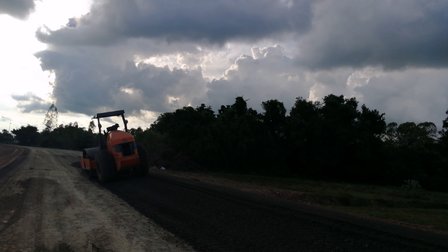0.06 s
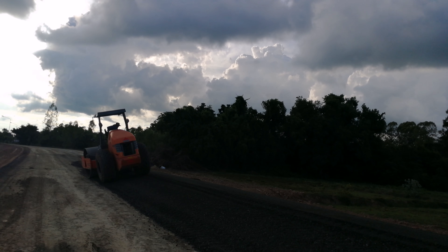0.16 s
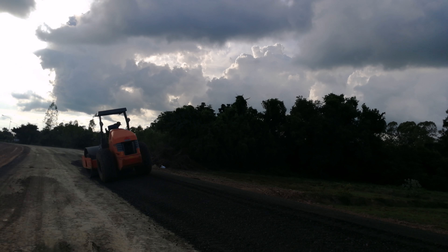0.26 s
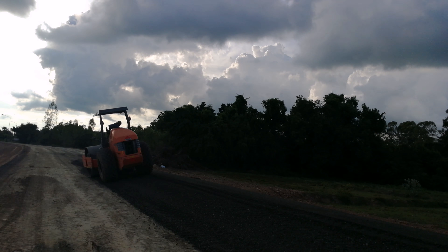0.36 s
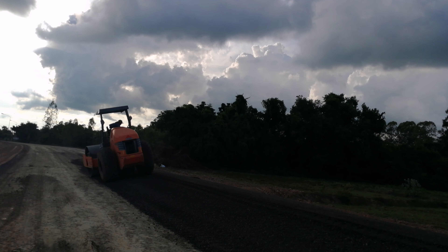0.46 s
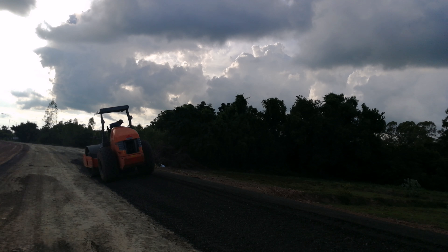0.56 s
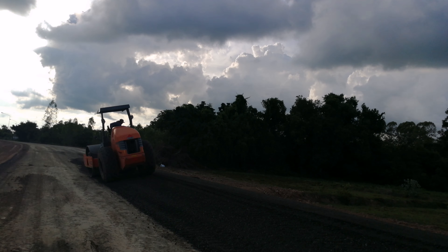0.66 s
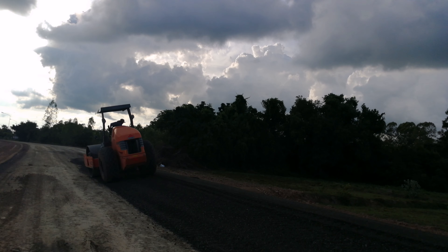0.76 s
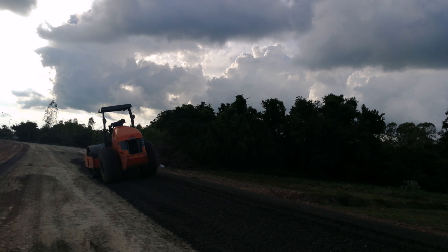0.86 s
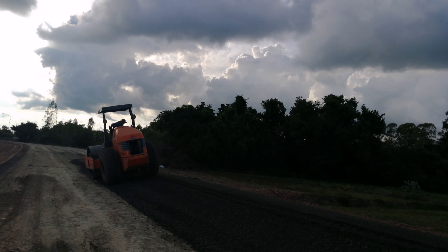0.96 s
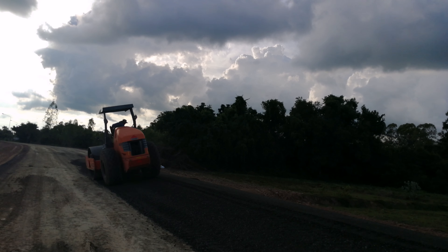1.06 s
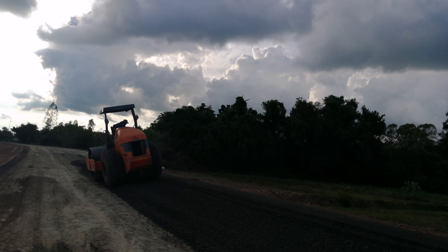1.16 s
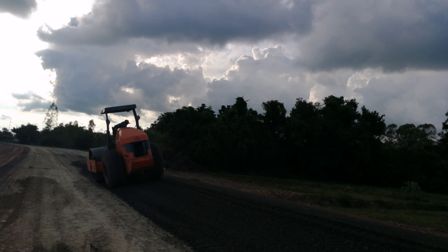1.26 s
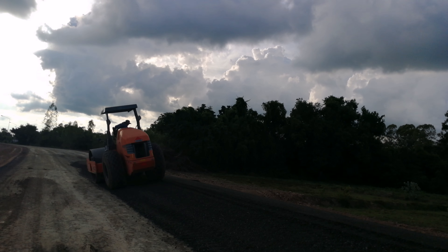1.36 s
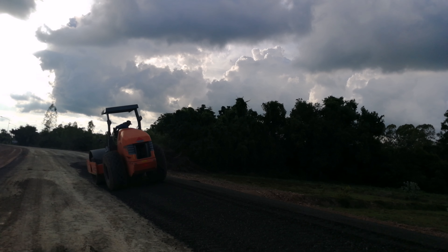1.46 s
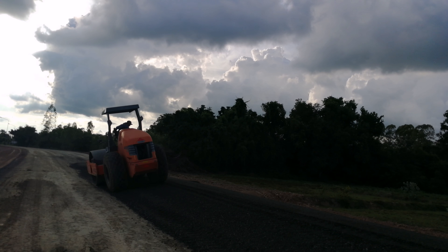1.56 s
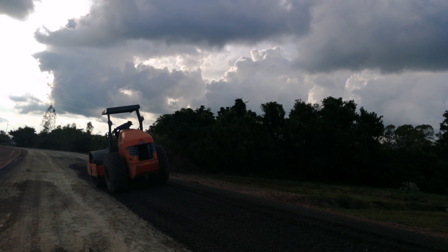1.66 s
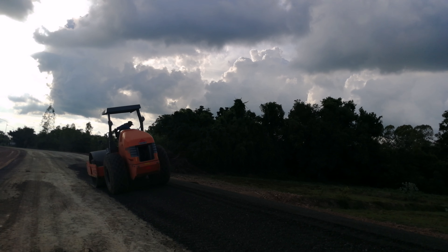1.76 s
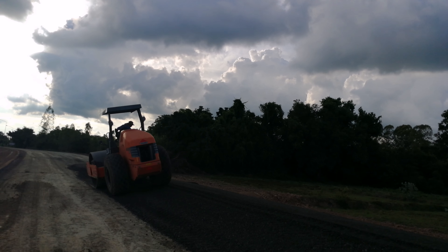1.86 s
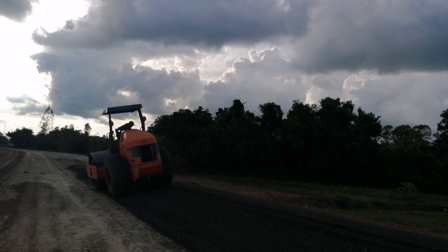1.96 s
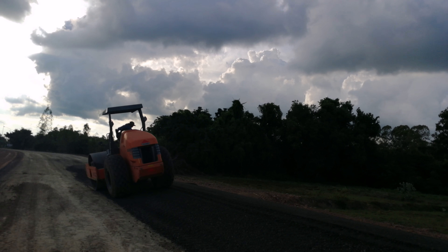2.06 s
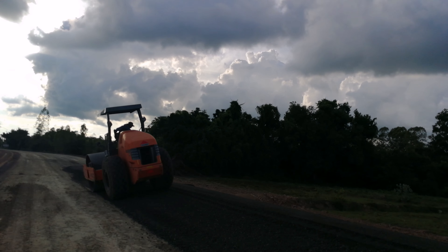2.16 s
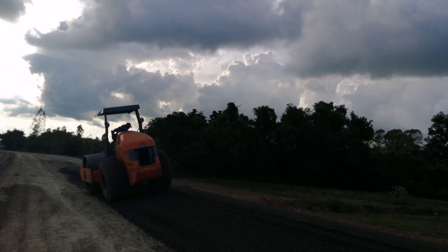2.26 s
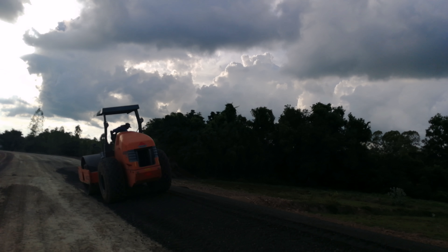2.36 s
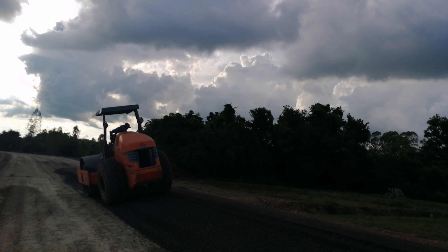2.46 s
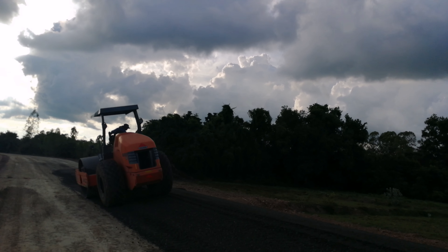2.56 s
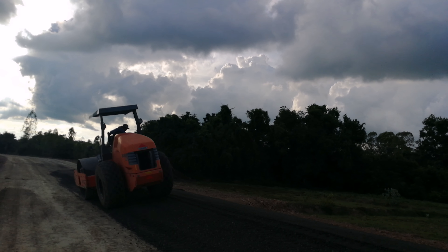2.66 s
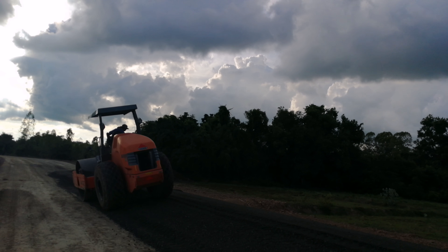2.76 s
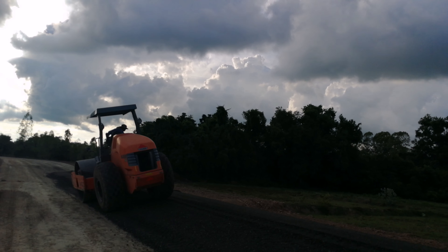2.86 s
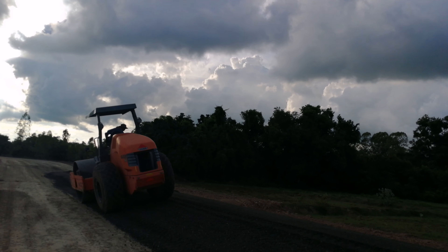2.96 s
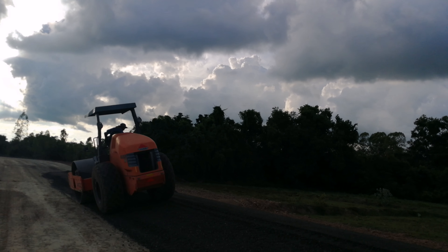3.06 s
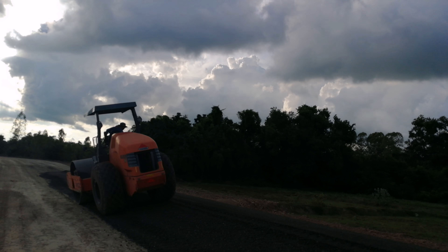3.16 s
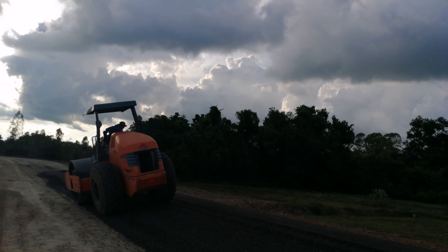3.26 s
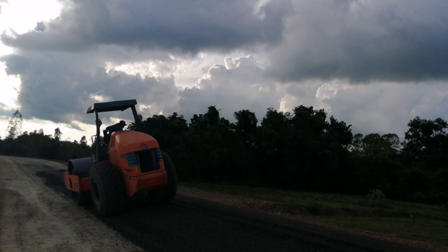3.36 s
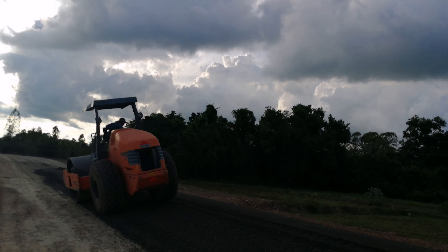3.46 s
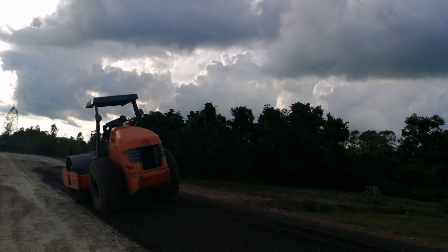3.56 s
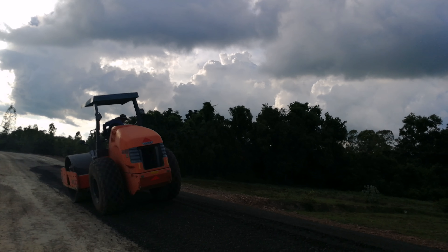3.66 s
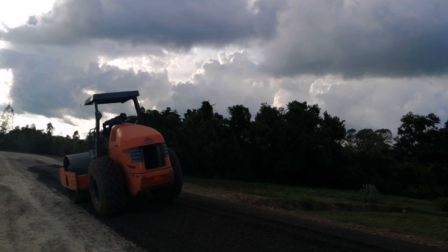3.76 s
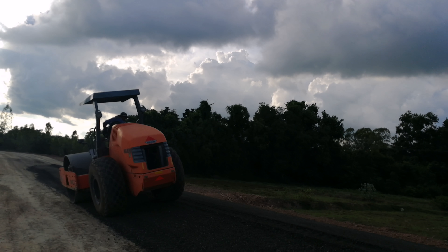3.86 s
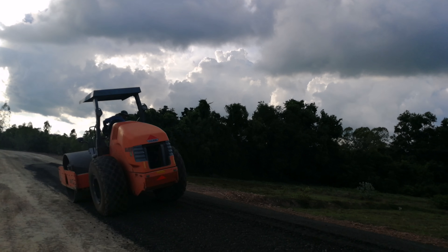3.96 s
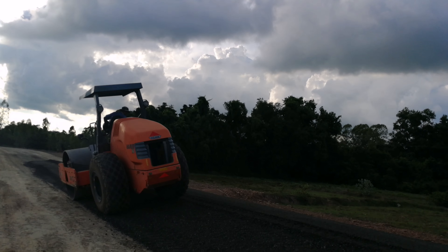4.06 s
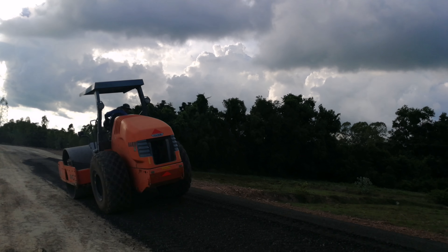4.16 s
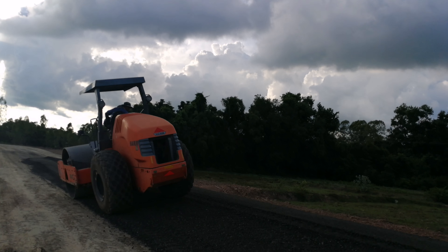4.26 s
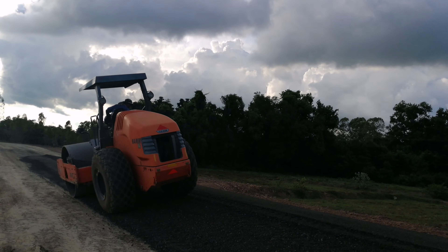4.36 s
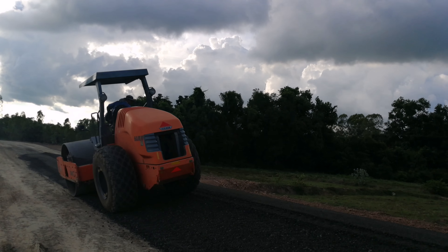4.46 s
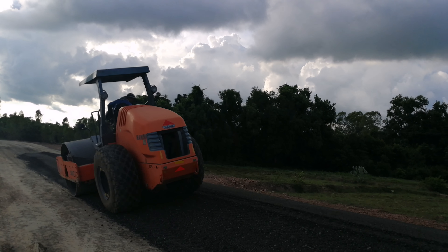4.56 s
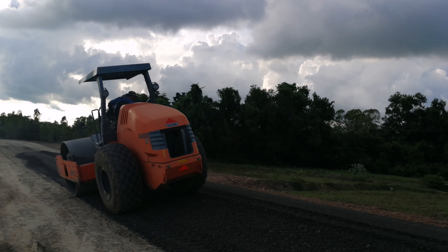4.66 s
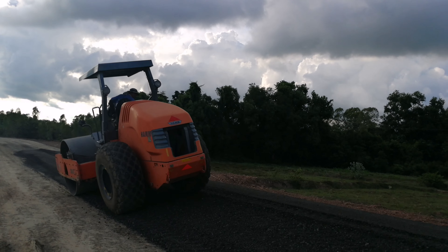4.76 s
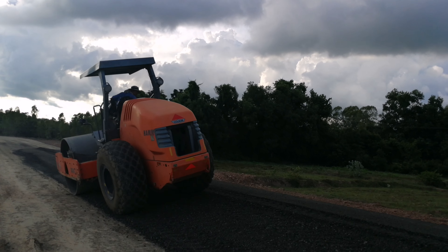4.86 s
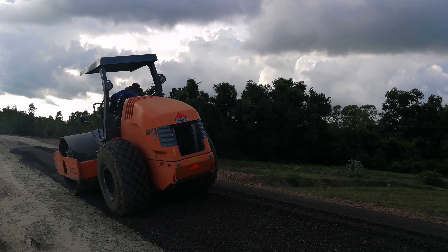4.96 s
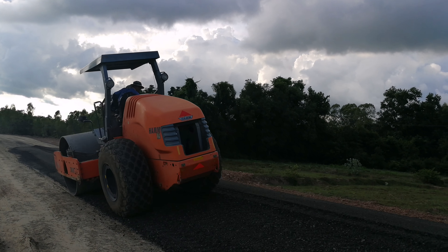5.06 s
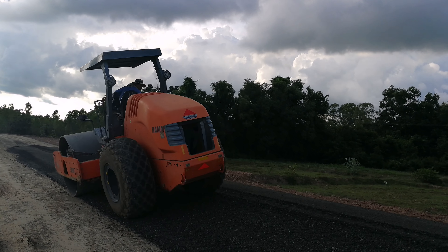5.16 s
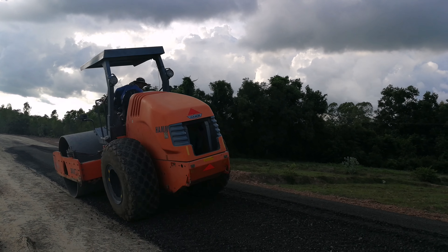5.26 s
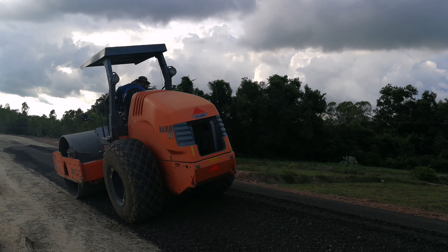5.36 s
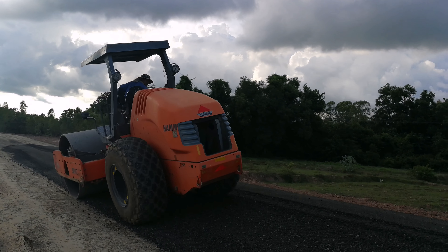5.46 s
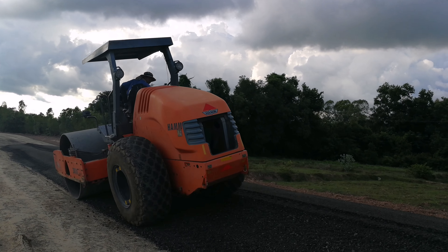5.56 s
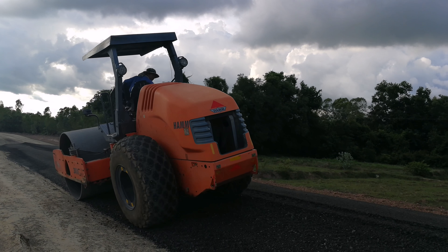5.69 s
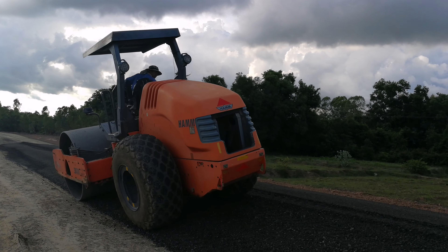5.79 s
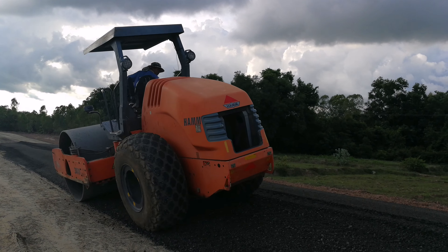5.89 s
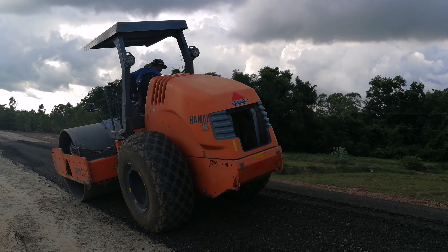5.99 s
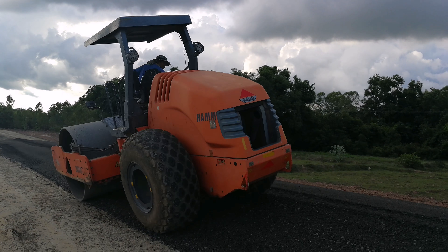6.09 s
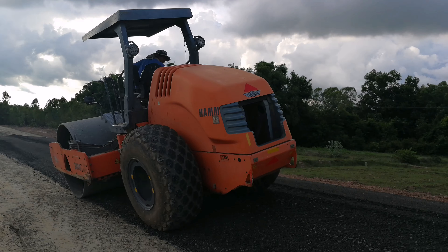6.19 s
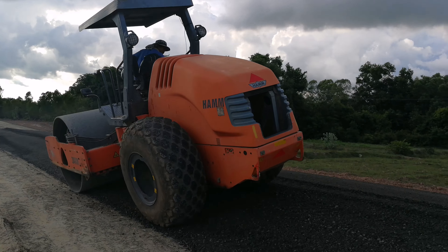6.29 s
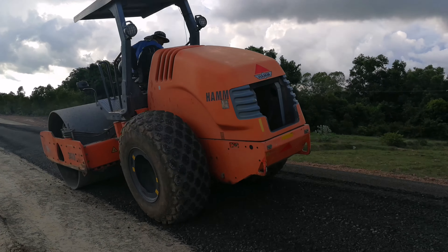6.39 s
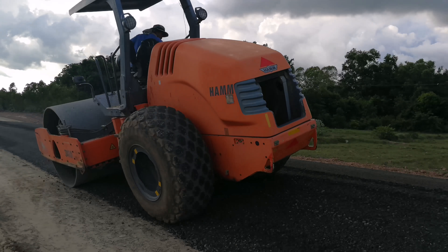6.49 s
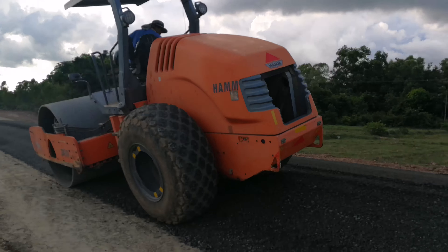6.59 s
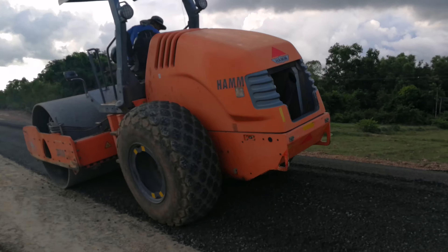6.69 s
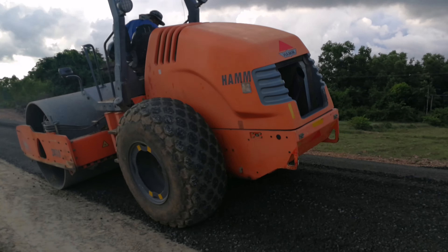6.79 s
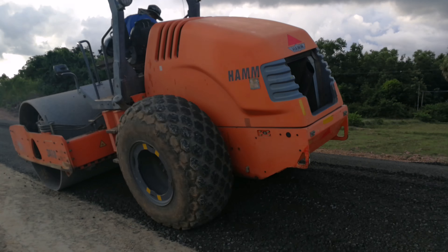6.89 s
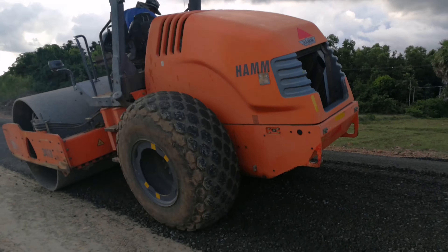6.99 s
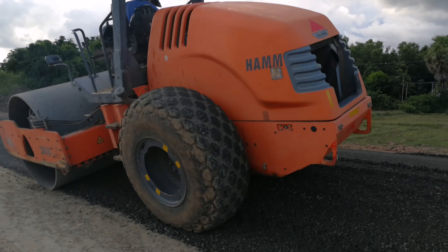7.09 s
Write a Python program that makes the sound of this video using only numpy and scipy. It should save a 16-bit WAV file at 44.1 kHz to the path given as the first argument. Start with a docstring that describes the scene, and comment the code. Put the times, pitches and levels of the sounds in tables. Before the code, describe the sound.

Steady throbbing diesel engine of an approaching road roller, low rumble and hissy clatter growing from distant to loud and close.

```python
"""Road roller approaching

A diesel road roller creeps closer over fresh road base at a steady governed speed, in the open air.
Exhaust tones drone over gas rumble; knocks boom in the engine bay; the fan whines and the grille roars.
Gears and a pump hum faintly, bands of noise swell and fade, stones crack under a tyre, and a few deep
thuds are probably wind. Bounces off road and chassis comb the sound, and the combs slide down as the
machine nears a phone with two microphone ports, which differ in shading, timing and scatter.
"""
import sys
import numpy as np
from scipy import signal
from scipy.fft import rfft, irfft, next_fast_len
from scipy.io import wavfile
from scipy.ndimage import map_coordinates

SR = 44100
rng = np.random.default_rng(int(sys.argv[2]) if len(sys.argv) > 2 else 0)


def waveform_to_disk(signal):
    """Save audio, clipped to [-1, 1], as 16-bit WAV at the path in sys.argv[1]."""
    frames = np.transpose(np.atleast_2d(signal))
    scaled = np.clip(frames, -1, 1) * 32767
    samples = np.round(scaled).astype(np.int16)
    wavfile.write(sys.argv[1], SR, samples)


N = 314433
TIME = np.arange(N) / SR


def exhaust(cycle):
    """Slowly swelling firing tones over the rumble of turbulent gas and the shaking of the frame."""
    # firing tones: cycle_multiple, level_db
    firing_orders = [(8, -0.5), (10, -13), (11, -23.5), (12, -22), (18, -17)]
    # shaking of the frame: cycle_multiple, level_db
    shake_orders = [(2, -26), (4, -4.5)]
    # turbulent gas: pitch_hz, relative density_db per Hz
    gas_spectrum = [(10, -22), (22, -13), (32, -18), (50, -4), (68, 0.5), (85, 6), (110, 3.5), (150, -1),
                    (200, -8), (400, -65)]
    crest_s, period_s, swell_db = 1.5, 0.93, 1
    swell = np.cos(2 * np.pi * (TIME - crest_s) / period_s)
    drone = tones(cycle, firing_orders) * undb(swell_db * swell)
    rumble = undb(-3.0) * colour(noise(), gas_spectrum) + tones(cycle, shake_orders)
    return drone * nearing(close_db=-32, loss_db=2.3) + rumble * nearing(close_db=-32.5, loss_db=5.35)


def hood(cycle):
    """Knocks and churning air boom in the engine bay, louder once the side vents face the phone."""
    # boom of the bay: pitch_hz, relative density_db per Hz
    bay_spectrum = [(20, -55), (100, -10), (150, 2.5), (185, 2.5), (212, -1), (245, 4), (300, 6), (340, 4),
                    (385, -6.5), (460, -11), (900, -71), (4000, -80)]
    vents_s, open_s, vents_db = 7.2, 0.61, 1
    knocks = clatter(cycle, ring_s=0.021, scatter_db=9.5, fresh=0.97)
    boom = colour(noise() + undb(-10) * knocks, bay_spectrum)
    return boom * nearing(close_db=-34.5, loss_db=0.13) * undb(vents_db * ramp(TIME, vents_s, open_s))


def clatter(cycle, ring_s, scatter_db, fresh, slop=.0012, count=8):
    """Injection and exhaust valve strike once a cycle in each cylinder; each rings the block its own way.

    A fresh share of noise keeps any two blows from being quite alike.
    """
    age = TIME[:2 ** 12]
    rings = rng.standard_normal((count, len(age)))
    decay = np.exp(-age / ring_s)
    loose = cycle + slop * drift(70)  # play in the gear train blurs the timing
    blow = np.floor(count * loose).astype(int)
    out = np.zeros(N + len(age))
    force = undb(scatter_db * rng.standard_normal(2 ** 12))
    starts = np.flatnonzero(np.diff(blow) > 0)
    for i, size in zip(starts, force):
        ring = rings[blow[i] % count] + fresh * rng.standard_normal(len(age))
        out[i:i + len(age)] += size * decay * ring
    return unit(out[:N])


def grille(cycle):
    """Fan wash, diesel clatter and gear whine leave by the grille; the treble throbs with the firings."""
    # fan wash and clatter: pitch_hz, relative density_db per Hz
    roar_spectrum = [(25, -54), (200, -10), (420, -4.5), (530, 3.5), (660, 3.5), (830, 2), (940, 3),
                     (1090, 2), (1250, 1), (1600, 1.5), (2050, 2), (2400, 3), (2620, 2), (2900, -20),
                     (3500, -6), (5000, -10), (12000, -29)]
    # timing gears and injection pump: cycle_multiple, level_db (before their wavering gain)
    gear_orders = [(23, -22), (30, -20), (32, -16), (36, -15.5), (45, -18), (54, -14.5), (59, -24),
                   (60, -43), (62, -48), (68, -19), (75, -32), (152, -21)]
    # treble hiss: pitch_hz, relative density_db per Hz
    hiss_spectrum = [(1500, -30), (3200, 8.5), (4000, -2), (4700, 1.5), (5500, -2), (7000, -2),
                     (8000, -0.5), (9400, -2), (10800, -11.5), (12500, -16.5), (15000, -40)]
    # ring of the injectors: pitch_hz, relative density_db per Hz
    ring_spectrum = [(1700, -44), (2150, -8), (2330, 3), (2600, -0.5), (2780, 1), (2950, -2.5),
                     (3150, -2.5), (3600, -42)]
    # the injectors' narrow beam sweeps across the phone; the grille faces up the road and turns away
    beam_s, beam_spread_s, beam_db = 4, 1, 2
    turn_s, turn_spread_s, turn_db = 6.55, 0.5, -2.5
    knocks = undb(-3.5) * clatter(cycle, ring_s=0.006, scatter_db=1.5, fresh=0.9)
    gears = tones(cycle, gear_orders) * undb(-5.0 + 1.0 * drift(23))
    roar = colour(noise() + knocks, roar_spectrum) + gears
    firing = np.cos(2 * np.pi * 4 * cycle)  # four firings a cycle
    hiss = colour(noise(), hiss_spectrum) * nearing(close_db=-32.5, loss_db=4.2)
    beam = undb(beam_db * bell(beam_s, beam_spread_s))
    ring = colour(noise(), ring_spectrum) * nearing(close_db=-38, loss_db=0.48) * beam
    gust = drift(24)  # uneven air through the radiator
    whine = fan() * nearing(close_db=-31.5, loss_db=1.55)  # the blade tones spread all round
    treble = (hiss + ring) * (1 + .11 * firing) * undb(0.49 * gust + 0.82 * drift(10))
    wash = roar * nearing(close_db=-25.5, loss_db=6.12) * undb(0.5 * gust)
    facing = undb(turn_db * ramp(TIME, turn_s, turn_spread_s))
    return (wash + treble) * facing + whine


def fan(blade_hz=326.1, skirt_hz=38, wander=0.048):
    """Blades chop uneven inflow: each tone is a line standing in a restless skirt."""
    # blade tones: blade_multiple, line_db, turbulent skirt_db
    blade_tones = [(1, -6.5, -20), (2, -20, -19), (3, -16, -13.5), (5, -28, -16), (6, -26, -17.5),
                   (9, -24, -13.5)]
    turn = blade_hz * TIME + wander * drift(2.92)
    out = 0
    for k, line_db, skirt_db in blade_tones:
        skirt = drift(skirt_hz) + 1j * drift(skirt_hz)
        size = undb(line_db) * np.sqrt(2) + undb(skirt_db) * skirt
        out = out + np.real(size * np.exp(2j * np.pi * (round(k) * turn + rng.random())))
    return out


def gear_whine(cycle, order=85, wobble=0.088):
    """One meshing gear sings a thin, wavering line that stands out for a while."""
    swell_s, spread_s, swell_db = 2.7, 0.75, 7
    phase = order * cycle + wobble * drift(5)
    line = np.sqrt(2) * np.sin(2 * np.pi * phase)
    return line * nearing(close_db=-54, loss_db=3.9) * undb(swell_db * bell(swell_s, spread_s))


def hydraulics(pump_hz=248):
    """A faint, unsteady hum, probably of the drive pump, out of step with the firings."""
    phase = pump_hz * TIME + 0.19 * drift(4.03)
    return np.sqrt(2) * np.sin(2 * np.pi * phase) * nearing(close_db=-54, loss_db=.5)


def swelling_bands():
    """Bands of noise, from narrow hums to broad hiss; each swells and fades."""
    # bands: peak_s, spread_s, pitch_hz, width_hz, level_db at the peak
    bands = [(.1, 0.052, 845, 71.4, -41), (.3, 0.53, 2840, 310, -46), (.6, 0.9, 1025, 60, -50),
             (.8, 1.75, 862, 200, -49.5), (1.15, .088, 844, 50, -44), (1.99, 0.071, 830, 30, -41.5),
             (2.2, .35, 344.4, 89, -43.5), (3.0, 0.83, 1647, 80, -46), (3.2, 0.63, 760, 130, -49.5),
             (3.701, 1.4, 193.7, 30, -42), (4.03, 0.12, 2140, 120, -43.5), (4.1, 1.15, 662.4, 32, -43.5),
             (4.68, 0.039, 667, 45, -32), (4.7, 0.13, 516, 18, -45), (5.2, 0.41, 657, 45, -40),
             (5.3, 1.4, 1933, 170, -42), (5.4, 1.1, 5000, 680, -53), (5.9, .7, 4220, 290, -51),
             (6.05, 0.076, 545, 19, -37.5), (6.2, 0.25, 1553, 300, -39), (6.5, 0.59, 2300, 350, -40.5),
             (6.5, 1, 253.2, 60, -36), (6.95, 0.39, 318, 60, -35), (6.95, 0.39, 681, 70, -34.5)]
    out = np.zeros(N)
    for s, spread_s, hz, width_hz, db in bands:
        on = np.abs(TIME - s) < np.pi * spread_s
        swing = (drift(width_hz) + 1j * drift(width_hz))[on]
        flutter = unit(np.sqrt(np.abs(swing)))  # the root evens the flutter out
        band = np.sqrt(2) * flutter * np.cos(2 * np.pi * hz * TIME[on] + np.angle(swing))
        out[on] += band * undb(db) * bell(s, spread_s, TIME[on])
    return out


def tyres(cracks_per_s=9000, spread_db=-1.0):
    """Countless small stones crack under the tread and merge into a rasp; one larger stone bursts."""
    # cracking stones: pitch_hz, relative density_db per Hz
    stone_spectrum = [(300, -35), (1500, 3.5), (2900, -1), (4500, 2.5), (5500, -20), (8000, -8),
                      (10500, -8), (15000, -28)]
    # close by, the flank comes into view and uncovers the near tyre
    uncover_s, open_s, uncover_db = 6, 0.14, 12
    burst_s, burst_spread_s, burst_db = 6.91, 0.034, 7
    struck = rng.random(N) < cracks_per_s / SR
    cracks = struck * np.sign(noise()) * undb(spread_db * noise())
    gain_db = uncover_db * ramp(TIME, uncover_s, open_s) + burst_db * bell(burst_s, burst_spread_s)
    return colour(cracks, stone_spectrum) * nearing(close_db=-47.5, loss_db=2.1) * undb(gain_db)


def buffets():
    """A few deep, soft thuds, probably wind buffeting the microphone: swells of low noise."""
    # thuds: peak_s, spread_s, level_db at the peak
    thuds = [(3.36, 0.11, -49), (5.02, 0.11, -48), (6.25, .25, -49), (6.65, 0.055, -40)]
    # low noise of the thuds: pitch_hz, relative density_db per Hz
    buffet_spectrum = [(12, -22), (28, -9), (45, 3), (62, -2), (82, 10), (115, -36)]
    low_noise = colour(noise(), buffet_spectrum)
    return low_noise * sum(undb(db) * bell(s, spread_s) for s, spread_s, db in thuds)


def outdoors(machine, size=1024):
    """Bounces off road and chassis comb the sound; two ports hear it with their own shade, lag and scatter."""
    # the phone's body between its ports: pitch_hz, left minus right far_db, the same close_db, left lead_rad,
    # scattered share_db (before a boost by decorrelation), extra share_db beside the flank
    ports_table = [(30, -2, 3, .02, -27, 0), (99, 0.5, 1, 0.19, -19, -4), (332, 0, -1, 0.6, -23, 11),
                   (430, .5, -5, 1.34, -11, 3), (517, 4, 10, 2.23, -13.5, 5),
                   (695, 12.5, 0.5, 1.06, -13, 5), (900, 4.5, 10, 0.51, -15, 8),
                   (1160, 3.5, 0, 1.3, -14, -1), (1640, -3.5, -0.5, 0.69, -11, 2),
                   (2010, -24.5, -6, 0.67, -8.5, 2), (2410, -6.5, -13.5, 2.9, -17.5, 3),
                   (2670, -11.5, -9.5, 3.1, -15, 23), (3050, -13.5, 0, 4.37, -4, 8),
                   (3920, 5, -4.5, 4.86, -1, 7), (4670, -3, -6, 6.07, -7, 15), (5230, 0, -3, 7, -4, 6),
                   (6300, -5.5, 1.5, 7.8, -5, 9), (7080, 0, -1, 9.7, -9.5, 14),
                   (8430, -6.5, 1, 14.3, 4, -1), (10000, 11.5, 2, 16.6, -14, 15),
                   (10700, 11, 8, 14.2, 7, 8), (12500, 3, 3, 15.6, 6, 13)]
    frames = dict(fs=SR, nperseg=size, noverlap=3 * size // 4)
    hz, s, direct = signal.stft(machine, **frames)
    _, aside = position(s)
    hz = hz[:, None]
    far_db, close_db, lead, share_db, flank_db = over_pitch(ports_table, hz)
    balance_db = far_db + (close_db - far_db) * ramp(s, 4.9, 1.1)
    # the long flank sends sound from many directions
    share = undb(share_db + flank_db * ramp(s, 5.8, 0.41))
    comb = bounces(hz, s)
    ports = []
    for side in (1, -1):  # left, right
        # each port's scatter has its own wandering phase: low tones stay steady, the treble turns diffuse
        wander = hz / 1400  # radians a frame: short waves change faster with the motion
        steps = np.cumsum(rng.standard_normal(direct.shape), axis=1)
        phase = 2 * np.pi * rng.random(hz.shape) + wander * steps
        scattered = (2 - .5 * np.exp(-wander ** 2 / 2)) * direct * np.exp(1j * phase)
        shade = np.sqrt(2 / (1 + undb(-2 * side * balance_db)))
        lagged = direct * np.exp(.5j * side * lead * aside)
        heard = (lagged + share * scattered) / np.sqrt(1 + share ** 2)
        ports.append(signal.istft(heard * comb * shade, **frames)[1][:N])
    return np.array(ports)


def bounces(hz, s):
    """Delayed copies off road and chassis cancel notches that slide down as the roller nears."""
    # reflections: pitch_hz, road_db, chassis_db (both scaled by strengths below)
    reflections = [(119, -11, -41), (300, 3.5, -20), (520, -2, 3), (1040, -5.5, 8.5), (1530, -36, -10),
                   (2260, -53, 0), (3460, -10, -26), (6000, -40, -30)]
    road_db, chassis_db = over_pitch(reflections, hz)
    distance, _ = position(s)
    grazing = ramp(distance, 7.34, 1.2)  # metres; far off, sound meets the road at a grazing angle
    road_hz = 190 + 27.2 * (distance - MISS_M)  # first road notch
    steep_strength, grazing_strength = 0.12, 0.48
    road = steep_strength + (grazing_strength - steep_strength) * grazing
    comb = 1 + road * undb(road_db) * np.exp(-1j * np.pi * hz / road_hz)
    # chassis notch spacing and strength both grow with distance
    chassis_hz = np.hypot(407, 24.8 * distance)
    chassis = 0.018 * distance * undb(chassis_db)
    comb = comb - chassis * np.exp(-2j * np.pi * hz / chassis_hz)
    # a longer detour cancels one narrow band, deeper far off and where the two paths are most alike
    null_hz, null_width_hz = 1454 * (distance / MISS_M) ** 0.297, 70
    null_db = -4.5 * grazing - 1 * bell(4, 1, s)
    comb = comb * undb(null_db * bell(null_hz, null_width_hz, hz))
    # the upper mids turn hollow for a while
    hollow_db = -2.2 * bell(5.7, 0.35, s)
    return comb * undb(hollow_db * bell(3150, 680, hz))


# the drive: speed, when it would draw level with the phone, and how far to the side
SPEED_M_S, PASSES_S, MISS_M = 2.325, 7.26, 4.5


def position(at):
    """The roller's distance (m) and how far off to the side it lies (1 far up the road, 0 straight ahead)."""
    along = SPEED_M_S * (PASSES_S - at)
    distance = np.hypot(along, MISS_M)
    return distance, along / distance


def nearing(close_db, loss_db, at=TIME):
    """Gain that grows as distance shrinks: its level at the closest point and loss per doubling."""
    distance, _ = position(at)
    return undb(close_db - loss_db * np.log2(distance / MISS_M))


def undb(db):
    """Decibels to gain."""
    return 10 ** (np.asarray(db) / 20)


def unit(x):
    """Scale to rms 1."""
    return x / np.sqrt(np.mean(x ** 2))


def over_pitch(table, hz):
    """Each column of a table, joined by straight lines in log frequency."""
    points, *columns = np.transpose(table)
    log_hz = np.log(np.maximum(hz, 1))
    return [np.interp(log_hz, np.log(points), column) for column in columns]


def colour(x, spectrum):
    """Filter a signal by a spectrum, then scale it to rms 1."""
    size = next_fast_len(N)
    db, = over_pitch(spectrum, np.arange(size // 2 + 1) * SR / size)
    return unit(irfft(rfft(x, size) * undb(db), size)[:N])


def noise():
    """White noise."""
    return rng.standard_normal(N)


def drift(rate):
    """Smooth chance with rms 1, changing about rate times a second."""
    coarse = TIME[::2 ** 5]
    path = map_coordinates(rng.standard_normal(2 ** 12), [coarse * rate + 1], order=3, mode="wrap")
    return unit(np.interp(TIME, coarse, path))


def tones(cycle, orders):
    """Sines locked to the engine's turning."""
    out = 0
    for k, db in orders:
        phase = round(k) * cycle + rng.random()
        out = out + undb(db) * np.sqrt(2) * np.sin(2 * np.pi * phase)
    return out


def ramp(x, middle, width):
    """A smooth step from 0 to 1."""
    return .5 + .5 * np.tanh((x - middle) / width)


def bell(peak, spread, at=TIME):
    """A smooth rise to 1 and fall, along time or frequency."""
    return np.exp(-((at - peak) / spread) ** 2)


def surges(table):
    """Gain that briefly rises, or dips where the level is negative, for each row of a table."""
    return undb(sum(db * bell(s, spread_s) for s, spread_s, db in table))


def scene():
    """One crankshaft times the firings, knocks and gears; the governor lets it hunt very slightly."""
    # the exhaust and engine bay briefly get louder or softer: peak_s, spread_s, change_db
    low_swells = [(1.21, 0.068, 2.5), (2.9, 0.02, 3), (3.28, 0.054, 3.5), (3.43, 0.024, 0),
                  (4.21, 0.028, 1), (4.49, 0.014, 5.5), (4.9, 0.083, 2), (5.2, .04, 3), (6.09, 0.12, -1.5)]
    # the sound from the grille flares briefly: peak_s, spread_s, change_db
    rasps = [(3.85, 0.067, 1), (4.08, 0.1, 1), (6.03, 0.039, 1)]
    cycle = 19.396 * TIME + .005 * drift(1.2) + .0008 * drift(12)  # four-stroke cycles turned so far
    engine = (exhaust(cycle) + hood(cycle)) * surges(low_swells)
    engine = engine + grille(cycle) * surges(rasps)
    engine = engine + gear_whine(cycle) + hydraulics()
    return outdoors(engine + swelling_bands() + tyres() + buffets())


def record(dry, top_hz=15200):
    """The phone cuts the top with a steep low-pass."""
    low_pass = signal.ellip(10, .2, 80, top_hz, fs=SR, output="sos")
    return signal.sosfilt(low_pass, dry)


dry = scene()
out = record(dry)
waveform_to_disk(out)
```